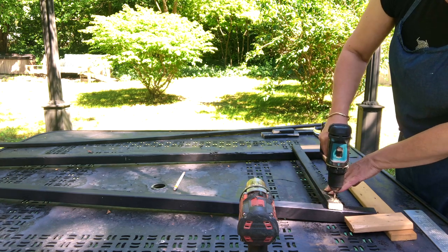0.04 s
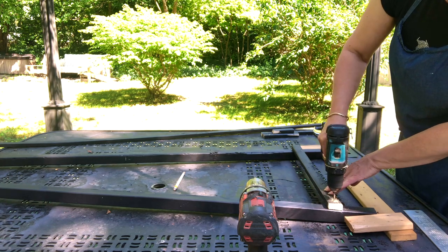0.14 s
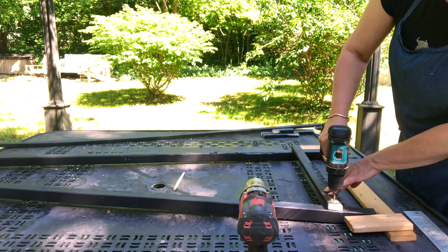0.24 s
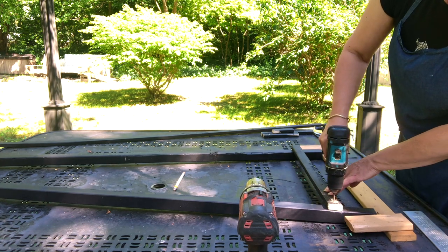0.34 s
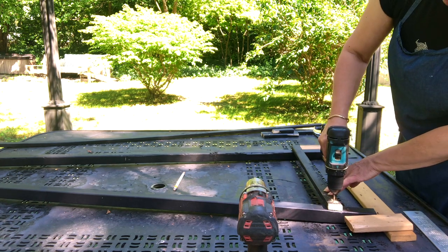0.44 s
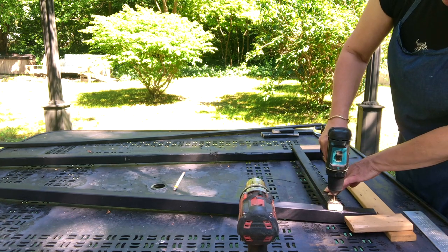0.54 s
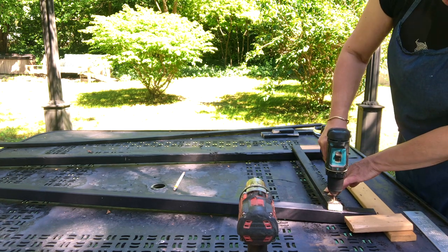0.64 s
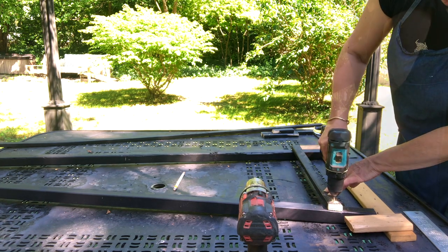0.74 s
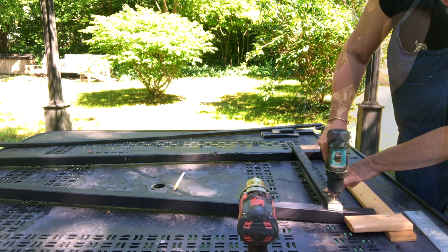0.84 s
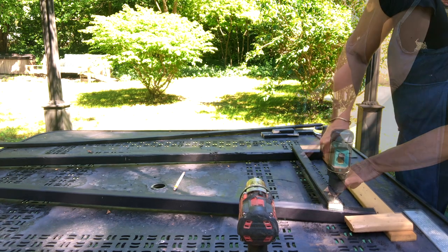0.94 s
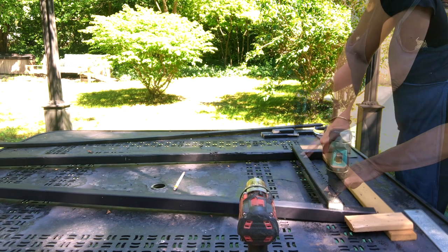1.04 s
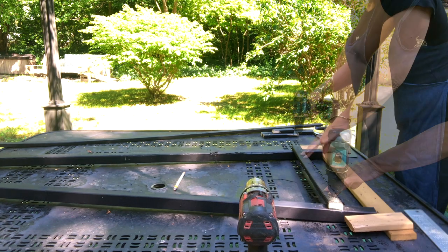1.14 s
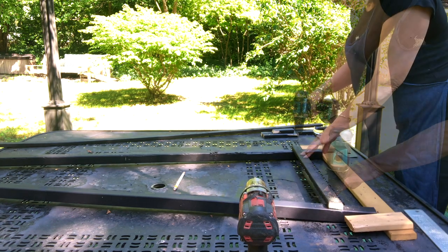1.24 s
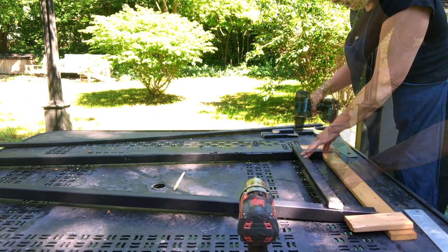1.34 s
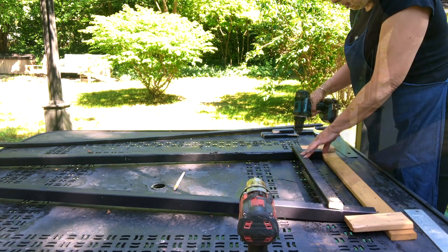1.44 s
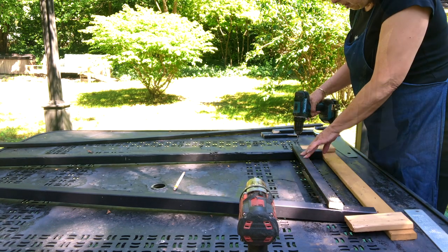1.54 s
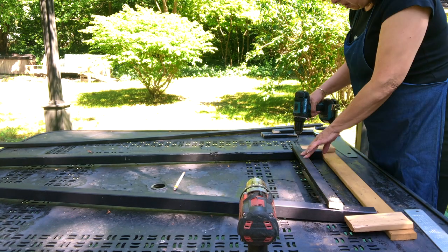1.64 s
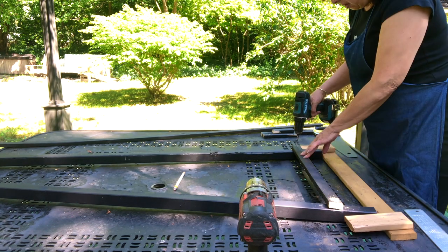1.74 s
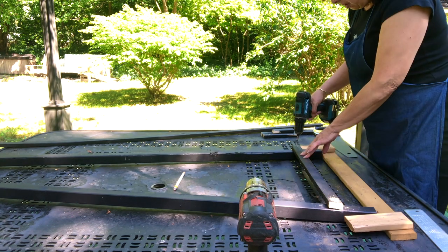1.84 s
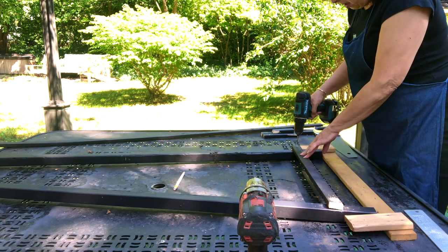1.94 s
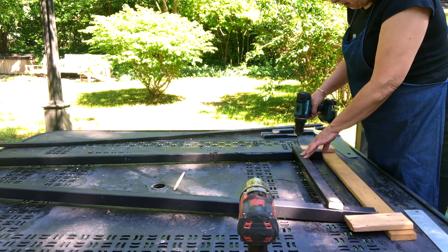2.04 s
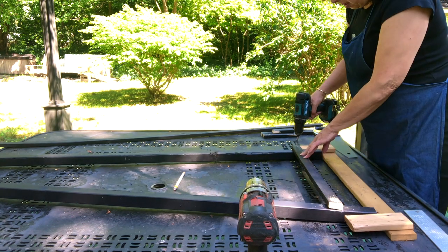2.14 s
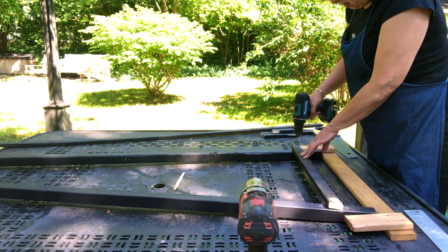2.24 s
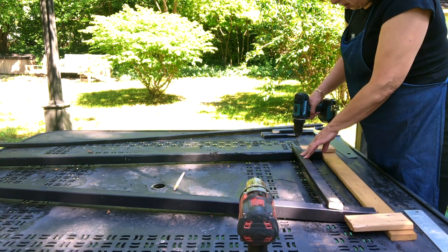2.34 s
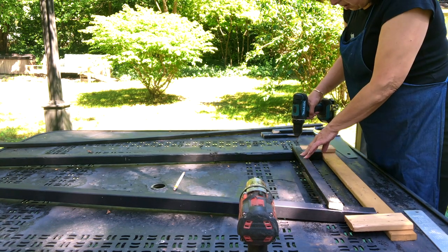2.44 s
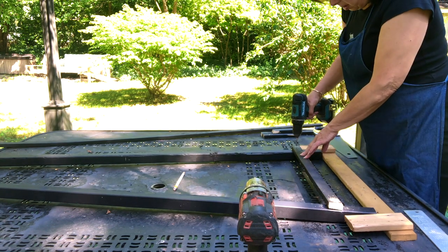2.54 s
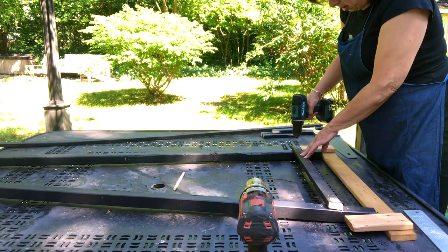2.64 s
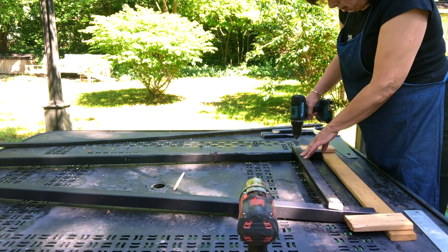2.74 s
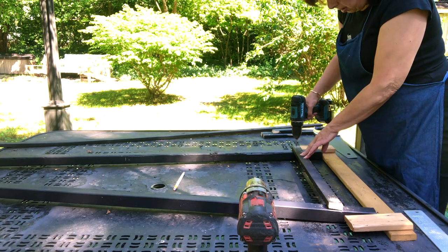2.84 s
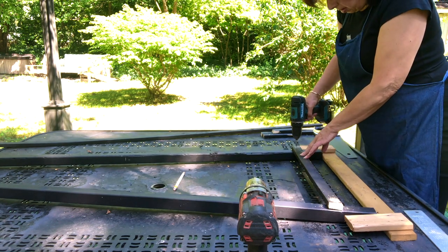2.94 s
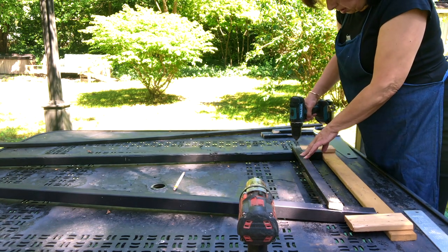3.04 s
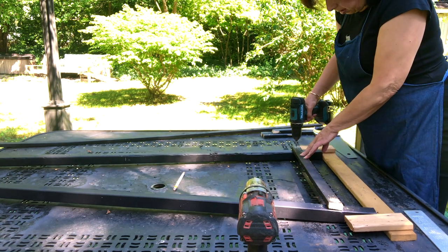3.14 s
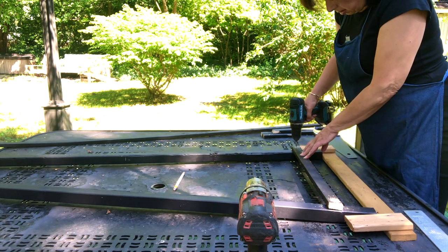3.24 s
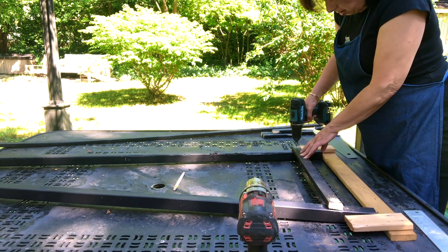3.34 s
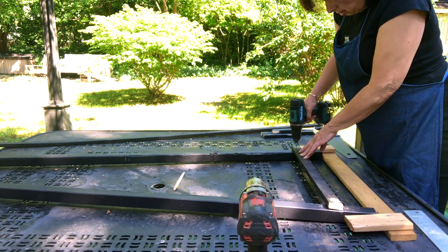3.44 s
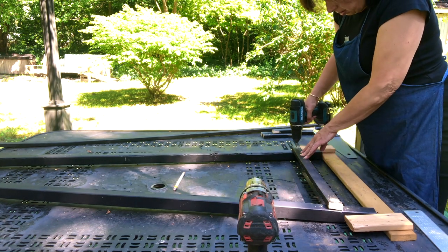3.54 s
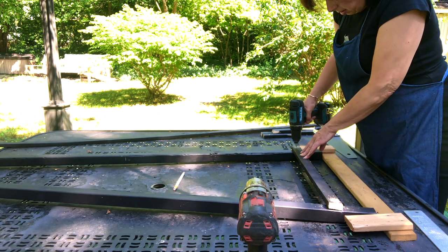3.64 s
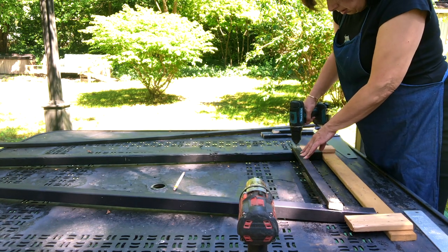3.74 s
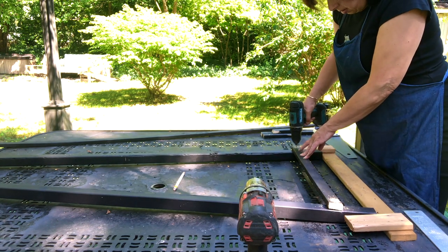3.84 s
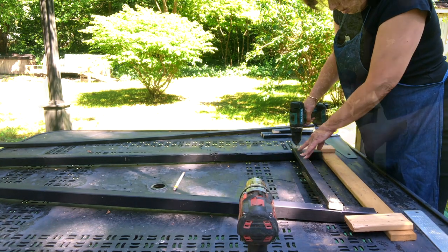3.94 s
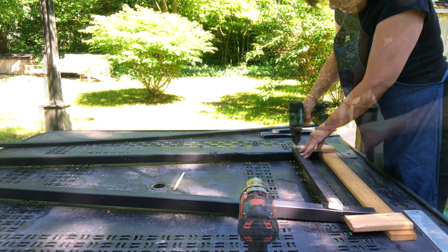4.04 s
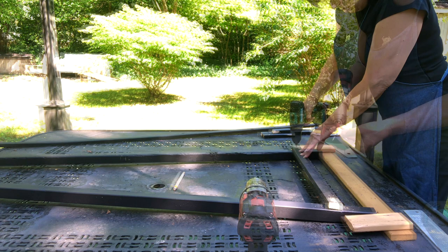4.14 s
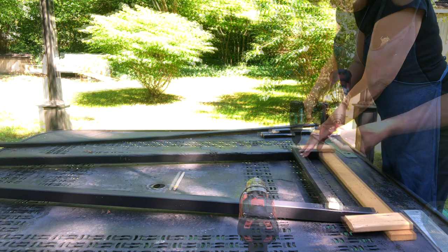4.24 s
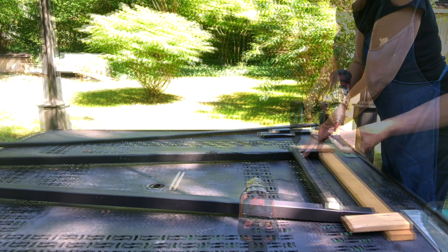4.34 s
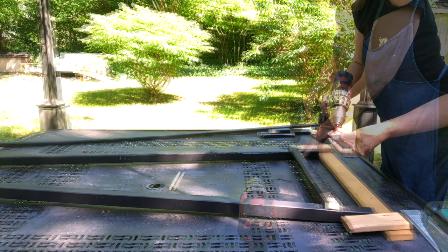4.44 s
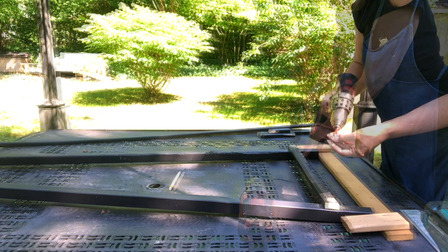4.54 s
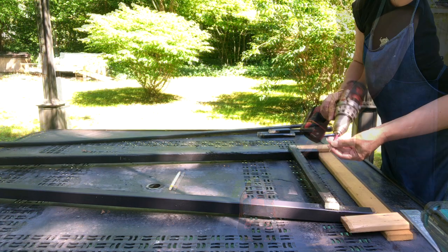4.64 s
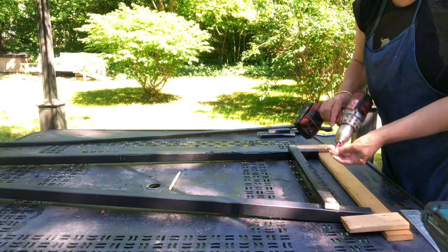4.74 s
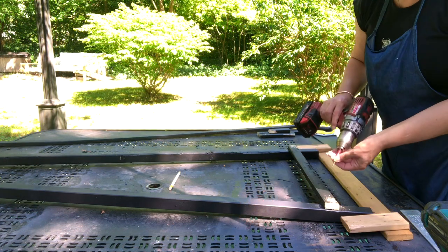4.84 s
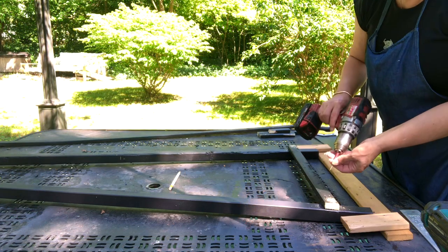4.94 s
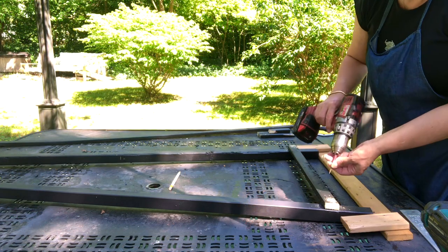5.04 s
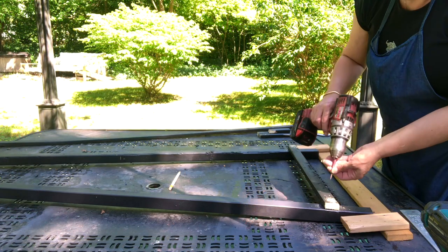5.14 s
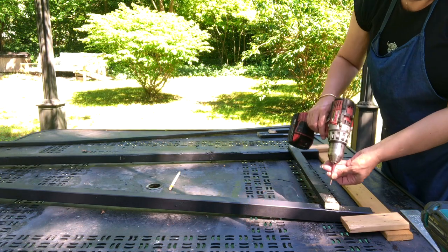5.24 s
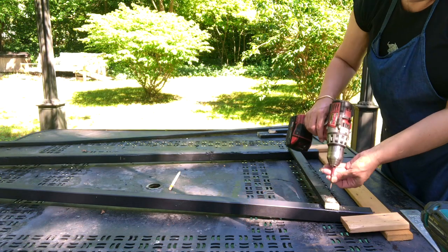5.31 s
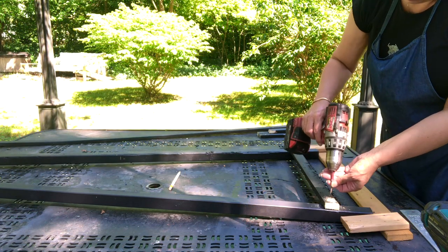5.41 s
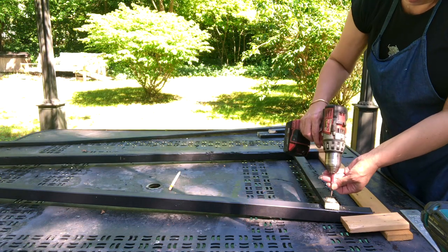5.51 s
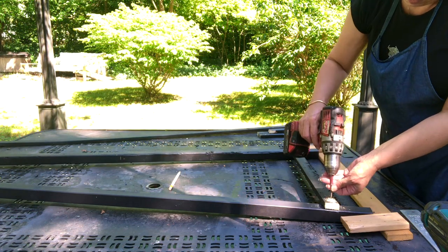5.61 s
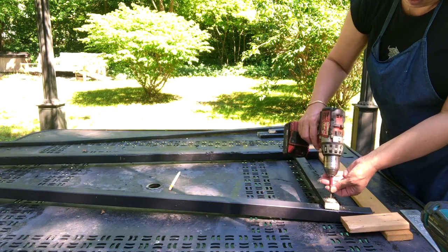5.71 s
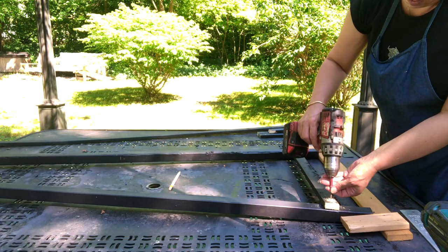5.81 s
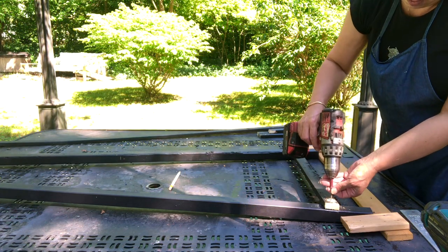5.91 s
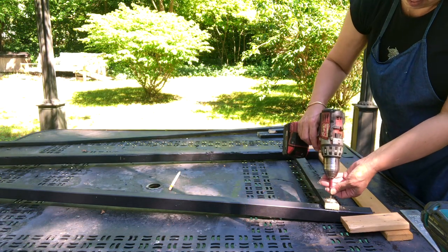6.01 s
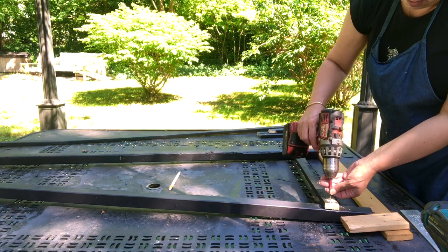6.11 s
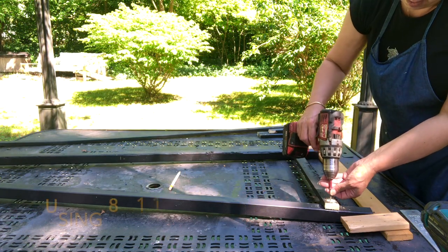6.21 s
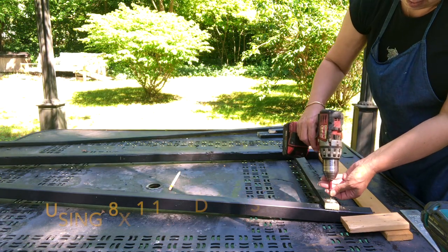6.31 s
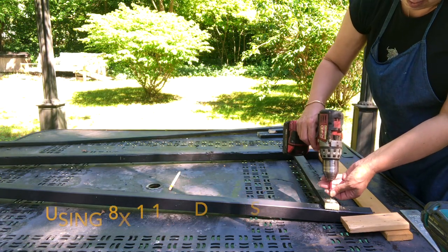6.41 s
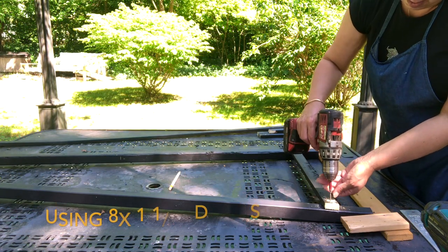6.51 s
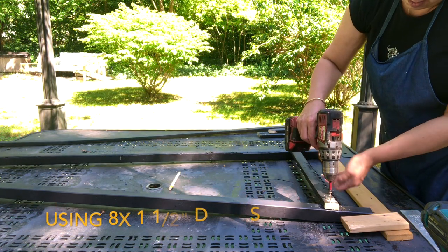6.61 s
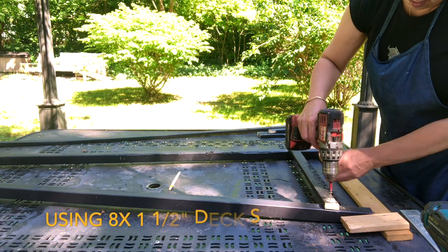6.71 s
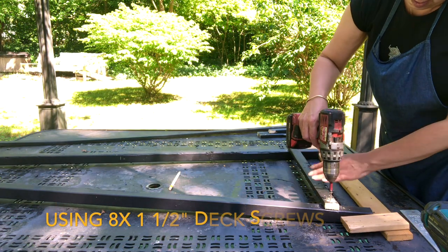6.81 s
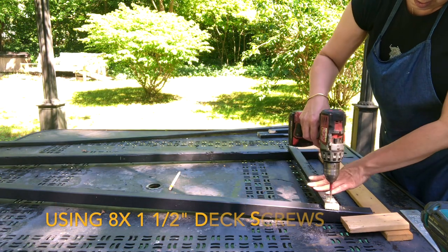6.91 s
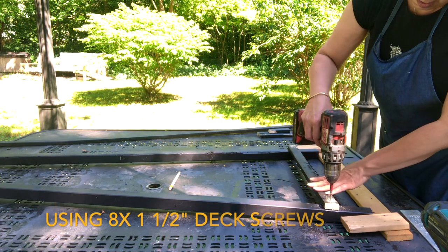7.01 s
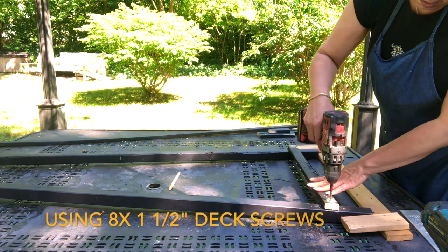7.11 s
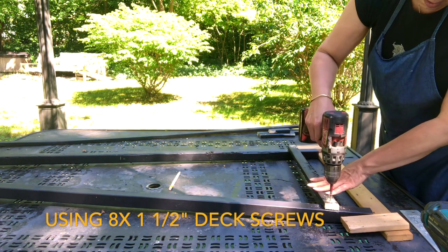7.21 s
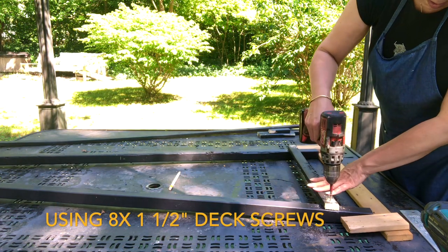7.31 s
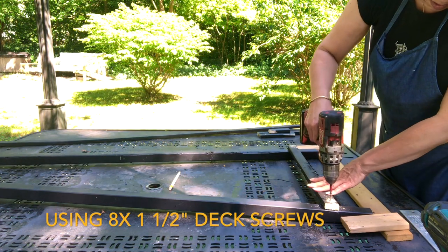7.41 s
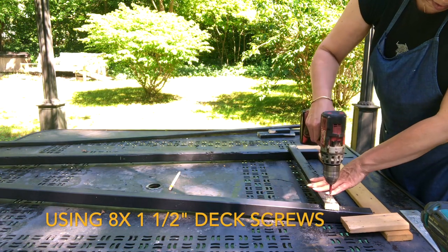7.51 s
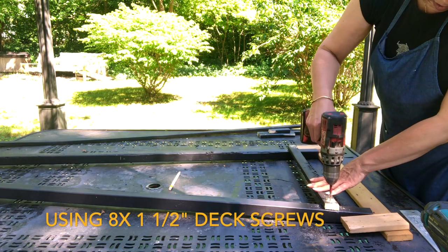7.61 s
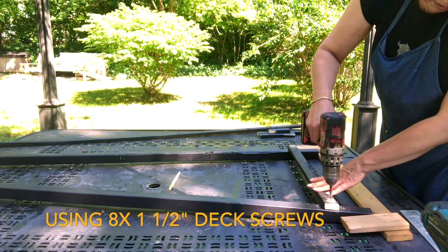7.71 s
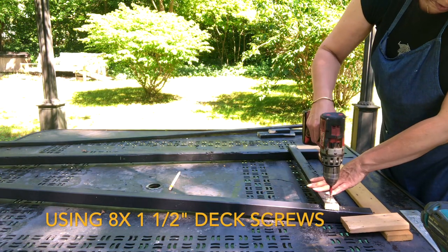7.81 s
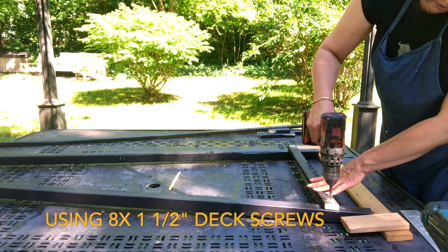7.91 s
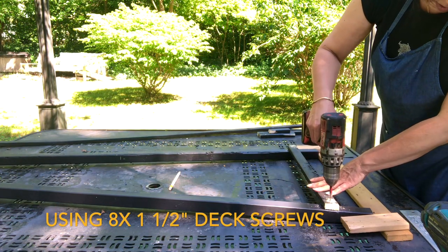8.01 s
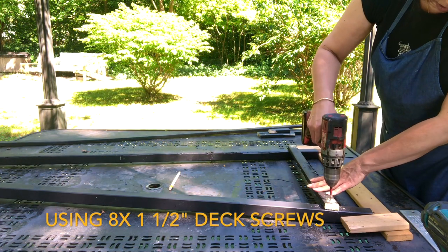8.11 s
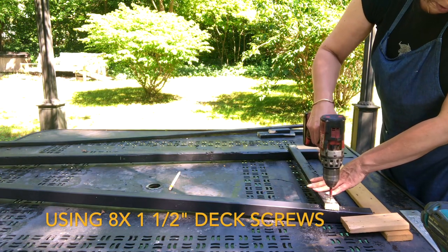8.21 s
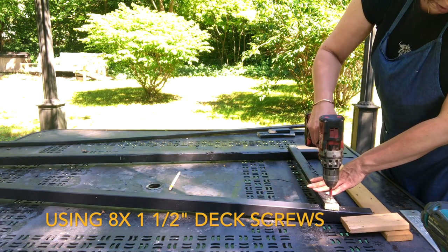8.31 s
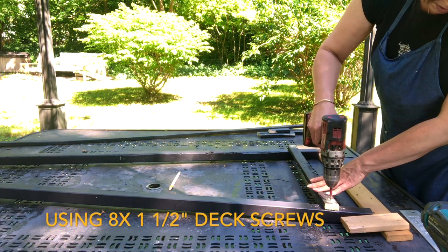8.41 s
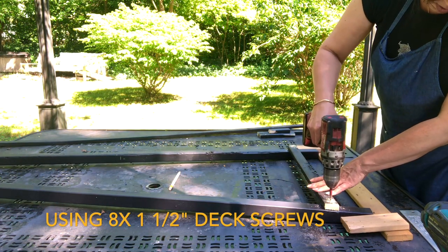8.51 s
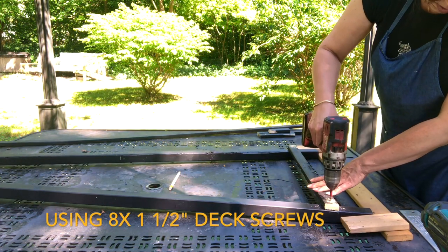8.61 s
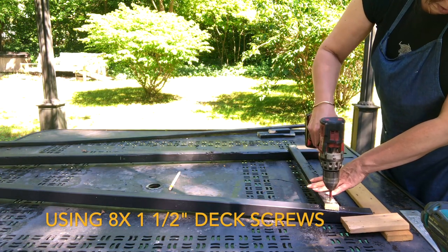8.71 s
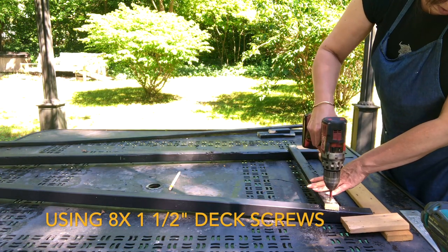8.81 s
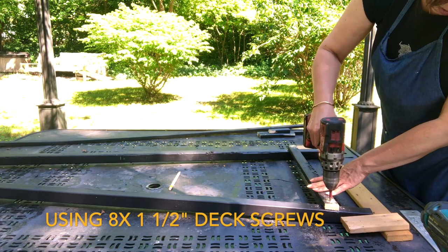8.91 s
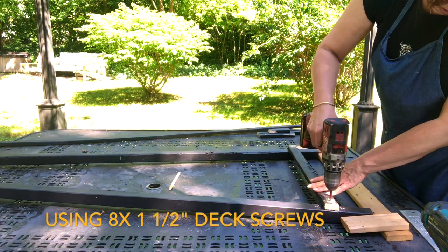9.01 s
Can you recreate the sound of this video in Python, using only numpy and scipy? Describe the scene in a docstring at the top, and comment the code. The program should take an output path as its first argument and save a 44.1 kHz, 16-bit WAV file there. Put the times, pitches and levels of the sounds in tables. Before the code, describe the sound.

Close mono pickup outdoors at a hollow plastic table. From 0 s a cordless drill is already running at full speed in wood: dense bright gear rattle, several high whines wavering slightly with load, low air rumble beneath. It fades from about 0.7 to 1.6 s. Sharp trigger clicks and a table jolt at 1.93-1.98 s start a second run, quieter, brighter and hissier, with singing whines; it bogs down slightly near 3.9 s, recovers, and fades by 4.9 s. A near insect buzzes behind it, the rumble swelling around 3.7 s. A distant engine rises in pitch, drops near 5.7 s and hums on. Two tiny rising bird chirps come at 5.6 and 5.8 s over hiss and a faint far insect. A rougher second drill pulls at 7.4-7.8, 7.9-8.3, 8.45-8.7 and 8.9-9.5 s, each led by a thin whistle, braking quickly, with small clicks and dull yard echoes.

```python
"""A cordless drill bores two pilot holes in wood on a hollow plastic table outdoors, each run fading away;
then a second drill drives a screw in four short trigger pulls. Clicks mark the triggers and gear play.
Both drills are coloured noise for the tooth contacts plus sines that follow the motor speed.
Behind them: air rumble and far hiss (shaped noise), a near and a far insect (pulse trains), two bird chirps
(gliding sines) and a distant engine (firing orders) that pulls away through a gear change."""
import sys
import numpy as np
from scipy import signal
from scipy.fft import rfft, irfft, next_fast_len
from scipy.io import wavfile

SR = 44100
rng = np.random.default_rng(int(sys.argv[2]) if len(sys.argv) > 2 else 0)


def unload_wav(signal):
    """Save mono or channel-first audio to the path in sys.argv[1] as 16-bit WAV at rate SR, clipped to [-1, 1]."""
    wavfile.write(
        sys.argv[1],
        SR,
        np.round(np.clip(np.atleast_2d(signal).T, -1, 1) * 32767).astype(np.int16),
    )


N = 399546
T = np.arange(N) / SR   # s


def amp(db):
    """dB to gain."""
    return 10 ** (np.asarray(db) / 20)


def to_db(gain):
    """Gain to dB."""
    return 20 * np.log10(gain)


def rms_one(x):
    """Scale to rms 1."""
    return x / np.sqrt(np.mean(x ** 2) + 1e-20)


def in_time(rows):
    """Columns as curves over time, and a gate that is open from the first row to just after the last."""
    s, *columns = np.transpose(rows)
    gate = np.clip(np.minimum(T - s[0] + .004, s[-1] + .02 - T) / .004, 0, 1)
    return gate, [np.interp(T, s, column) for column in columns]


def drift(rate):
    """Slow chance: random points of spread 1, rate a second, joined by half-cosines."""
    points = rng.standard_normal(int(N / SR * 400) + 9)
    at = T * min(rate, 399)
    whole = at.astype(int)
    blend = .5 - .5 * np.cos(np.pi * (at - whole))
    return points[whole] * (1 - blend) + points[whole + 1] * blend


def resonance_db(hz, peaks):
    """Summed lift of resonances, each given by its centre in Hz, width in Hz and lift in dB."""
    return sum(lift / (1 + (2 * (hz - at) / width) ** 2) for at, width, lift in peaks)


def colour(x, spectrum, peaks=(), edges_hz=(1, 40000)):
    """Shape by a spectrum and resonance lifts, split at the edges; each band rms 1."""
    size = next_fast_len(N)
    hz = np.maximum(np.fft.rfftfreq(size, 1 / SR), 1)
    table = np.array(spectrum)
    db = np.interp(np.log(hz), np.log(table[:, 0]), table[:, 1]) + resonance_db(hz, peaks)
    shaped = rfft(x, size) * amp(db)
    below = [1 / (1 + (hz / edge) ** 10) for edge in edges_hz]
    return [rms_one(irfft(shaped * np.sqrt(np.abs(high - low)), size)[:N])
            for low, high in zip(below, below[1:])]


def ring(clicks, hz, t60):
    """A resonator: a unit click sets off a dying sine that starts at about height 1."""
    r, w = amp(-60 / (t60 * SR)), 2 * np.pi * hz / SR
    return signal.lfilter([0, np.sin(w)], [1, -2 * r * np.cos(w), r * r], clicks + 1e-18)


def tone(hz, flicker_db, rate):
    """A sine of rms about 1 on a pitch curve, its level flickering."""
    phase = np.cumsum(hz + 0 * T) / SR + rng.random()
    return np.sqrt(2) * amp(flicker_db * drift(rate)) * np.sin(2 * np.pi * phase)


# three passages melt into one another: end of each cross-fade in s, its length in s, shape
FADE_ENDS_S, FADE_S, FADE_CURVE = (1.638, 4.887), 0.99, 2.05


def passages():
    """Gain of each passage: it rises as the one before it sinks."""
    turn = [np.pi / 2 * np.clip((T - end) / FADE_S + 1, 0, 1) for end in FADE_ENDS_S]
    out = [np.cos(x) ** FADE_CURVE for x in turn]
    into = [np.sin(x) ** FADE_CURVE for x in turn]
    return out[0], into[0] * out[1], into[1]


def gears(rotor_hz, levels, spectrum, case, edges_hz, throb, rough_db):
    """Dense tooth contacts, throbbing once a rotor turn, heard through table, housing, gearbox and vents."""
    rattle_db, housing_db, treble_db, *boom_db = levels
    turn = np.sin(2 * np.pi * np.cumsum(rotor_hz * (1 + .02 * drift(30))) / SR)
    roughness = amp(rough_db * drift(300) + .5 * drift(25))
    contacts = rng.standard_normal(N) * (1 + throb * turn) * roughness
    *boom, housing, rattle, treble = colour(contacts, spectrum, case, edges_hz)
    # the bands run upwards, the levels list the boom before the deeper thud
    table = sum(amp(db) * band for db, band in zip(boom_db[::-1], boom))
    return table + amp(rattle_db) * (rattle + amp(housing_db) * housing + amp(treble_db) * treble)


# Colour of the pilot drill, near the microphone and turned away. Each row: frequency in Hz, density in dB per Hz.
NEAR_COLOUR, AWAY_COLOUR = [(120, -45.5), (200, -9), (340, -21.5), (408, -13.5), (447, -16), (1110, -17.5),
                            (1920, -12.5), (2670, -20), (3330, -11), (3510, -7.5), (3780, -7.5), (4790, -1),
                            (5450, -5.5), (7290, -6.5), (15700, -9)], [(120, -36), (200, -6), (352, -12.5), (415, -7), (620, -10),
                                          (862, -8), (927, -8.5), (1460, -6), (1920, -2.5), (2620, -3.5),
                                          (3090, -2), (5550, 6), (7030, 6), (7850, 4.5), (15700, -5.5)]
# Resonances of its case, heard the same two ways. Each row: centre in Hz, width in Hz, lift in dB.
NEAR_CASE, AWAY_CASE = [(412, 26, 7), (657, 48, 8), (1277, 81, 8), (1880, 760, 4.5), (4740, 670, 2),
                        (5480, 280, -4), (6500, 230, 3), (7360, 320, 2.5), (8160, 380, 4), (9250, 320, -1),
                        (9950, 580, 0.5), (11000, 520, -6.5), (11800, 240, 1), (12900, 240, 0.5),
                        (14150, 620, 1)], [(618, 33, 8.5), (790, 44, 4.5), (1990, 440, 5), (5170, 170, 2),
                                           (12200, 400, -3), (4205, 680, 7.5), (4980, 300, 3.5),
                                           (5960, 420, 4), (6900, 630, 3), (11200, 230, 3.5),
                                           (12840, 600, 1)]
# The two holes. Each row: motor start in seconds, gear rattle in dB at full speed, then housing, treble
# and table boom in dB re rattle, also at full speed.
HOLES = [(-1, -22, -6.5, -7.5, -15), (1.962, -26.5, -7.5, -11, -12)]
# Load on the bit, one list a hole. Each row: time in seconds, speed as the pitch step in Hz that the
# whines share, before spin-up and small wander.
LOAD = [
    [(0, 397.6), (.23, 398), (.3, 396.3), (.35, 393), (.47, 395.2), (.56, 390.2), (.72, 387.8),
     (.84, 393.3), (.964, 389.5), (1.166, 399.4), (1.31, 399), (1.45, 402)],
    [(2.25, 398.8), (2.52, 400.2), (2.73, 392.2), (2.86, 394.1), (2.94, 390.8), (3.08, 391.8),
     (3.39, 383.5), (3.52, 388.2), (3.89, 374.5), (3.94, 375.3), (4.13, 389.8), (4.28, 393.7), (4.33, 391),
     (4.69, 399.4), (4.76, 397), (4.86, 362)],
]
# Pitches of the whines in steps: rotor hum, commutator, mesh, a second commutator multiple, fan, a third.
WHINE_STEPS = (2.4, 8, 9, 16, 18.4, 24)
# Mean level of the commutator, mesh and fan whines, one list a hole. Each row: time in seconds, then
# commutator, mesh and fan in dB re rattle.
SINGING = [
    [(0, -15, -5, -14.5), (.3, -17, -8, -20), (.6, -17, -1, -13.5), (1, -17.5, -1, -10.5),
     (1.2, -22, -4, -14), (1.5, -18, -16, -9)],
    [(2.1, -13, -25, -7), (2.2, -20, -21, -12), (2.35, -13.5, -12.5, -22), (2.55, -12, -7.5, -12),
     (2.75, -15, -10.5, -6), (3.2, -13.5, -10.5, -2.5), (3.6, -12.5, -8, -6.5), (3.9, -15.5, -13.5, -14.5),
     (4.2, -10, -7.5, -4.5), (4.7, -9.5, -9.5, -4), (4.82, -13, -23, -12)],
]
# Mean level of the whines at 2.4, 16 and 24 steps. Each row, one a hole: the three in dB re rattle.
OTHER_WHINES = [(-30, -14, -27), (-21.5, -13.5, -18)]
# Resonances where a whine flares as it crosses. Each row: centre in Hz, width in Hz, lift in dB.
FLARES = [(2920, 260, 8.5), (6755, 400, 4), (8350, 500, 14.5)]
# Faint upper commutator orders, in steps.
UPPER_ORDERS = (32, 40)
ROTOR_PER_STEP, SPIN_UP_S = .8, .055
RATTLE_POWER, HOUSING_POWER, TREBLE_POWER, BOOM_POWER = 0.84, 3.2, 2.6, 0.88   # gains go as speed to these
WHINE_WANDER_DB, ROTOR_HUM_BREAKS_DB = 3, 4
SIDE_LINE_DB, UPPER_ORDERS_DB = -14.5, -18   # re mesh whine, re treble
JOLT_S, JOLT_T60_S, JOLT_DB = 1.927, .55, -33   # the trigger hand shakes the table


def pilot_drill(hole, load, singing, others, spectrum, case):
    """Gear rattle plus rotor, commutator, mesh and fan whines, all locked to the motor speed."""
    start, rattle_db, housing_db, treble_db, boom_db = hole
    spin = np.clip(1 - np.exp(np.minimum(start - T, 0) / SPIN_UP_S), .001, 1)
    spin_db = to_db(spin)

    boom_db = rattle_db + boom_db
    if start > 0:   # a motor that starts within earshot
        jolt = amp(JOLT_DB - 60 * np.abs(T - JOLT_S) / JOLT_T60_S) * (T > JOLT_S)
        boom_db = to_db(amp(boom_db + BOOM_POWER * spin_db) * (T > start) + jolt + 1e-9)
    rattle_db = rattle_db + RATTLE_POWER * spin_db
    housing_db = housing_db + HOUSING_POWER * spin_db
    treble_db = treble_db + TREBLE_POWER * spin_db

    _, (step_hz,) = in_time(load)
    step_hz = step_hz * spin * (1 + 0.00068 * drift(40) + .002 * drift(12))
    out = gears(ROTOR_PER_STEP * step_hz, (rattle_db, housing_db, treble_db, boom_db), spectrum, case,
                (200, 1200, 2600, 9000, 40000), throb=0.12, rough_db=0.5)

    _, (commutator_db, mesh_db, fan_db) = in_time(singing)
    rotor_db = others[0] + ROTOR_HUM_BREAKS_DB * drift(14)
    whine_db = rotor_db, commutator_db, mesh_db, others[1], fan_db, others[2]
    for steps, db in zip(WHINE_STEPS, whine_db):
        flare_db = resonance_db(steps * step_hz, FLARES)
        level_db = rattle_db + db + flare_db + 1.5 * spin_db + WHINE_WANDER_DB * drift(5)
        out += amp(level_db) * tone(steps * step_hz, 1.2, 60)
    # side line of the mesh: a gear runs out of round
    out += amp(rattle_db + mesh_db + SIDE_LINE_DB) * tone(10 * step_hz, 2.4, 30)
    for steps in UPPER_ORDERS:
        out += amp(rattle_db + treble_db + UPPER_ORDERS_DB) * tone(steps * step_hz, 4, 12)
    return out


# Open air around the table. Each row, one a passage: rumble, drone, far hiss and insect, all mean level in dB.
AIR = [(-43, -43, -57, -100), (-58, -52, -53.5, -56.5), (-58.5, -54.5, -56, -74)]
# Colour of rumble with drone, and of the far hiss. Each row: frequency in Hz, density in dB per Hz.
RUMBLE_COLOUR, HISS_COLOUR = [(12, -48.5), (20, -21.5), (45, 1.5), (70, 9), (285, -8.5), (315, -2.5),
                              (344, -21.5), (400, -8.5), (520, -26.5), (880, -120)], [(250, -2.5), (400, -3), (830, -3), (1150, -4.5), (1600, -8.5),
                                              (2500, -16), (4000, -19.5), (7700, -27), (10000, -31),
                                              (15700, -37)]
# A swell of the rumble: its peak in seconds, width in seconds, lift in dB.
SWELL = (3.75, 0.57, 11)


def open_air(fades):
    """Lumpy low rumble, a drone above it and smooth far hiss, all shaped noise."""
    rumble_gain, drone_gain, hiss_gain = (
        sum(amp(row[k]) * fade for row, fade in zip(AIR, fades)) for k in range(3))
    peak_s, width_s, lift_db = SWELL
    swell_db = lift_db * np.exp(-((T - peak_s) / width_s) ** 2)
    rumble, drone = colour(rng.standard_normal(N), RUMBLE_COLOUR, edges_hz=(30, 115, 330))
    hiss = colour(rng.standard_normal(N), HISS_COLOUR, edges_hz=(330, 40000))[0]
    out = rumble_gain * amp(swell_db + 0.61 * drift(5.5)) * rumble
    out += drone_gain * amp(0.79 * drift(1.6)) * drone
    return out + hiss_gain * amp(0.52 * drift(3.2)) * hiss


def insect(pulses_per_s, song, edges_hz):
    """Steady wing pulses give a comb of thin lines; strips of it swell and sink on their own."""
    wing_turns = np.cumsum(pulses_per_s * (1 + 0.0021 * drift(4.2))) / SR
    pulses = np.diff(np.floor(wing_turns), prepend=0)
    buzz = pulses * amp(3.5 * drift(150)) + 0.076 * rng.standard_normal(N)
    buzz = colour(buzz, song, edges_hz=edges_hz)[0]
    size = next_fast_len(N)
    spectrum, hz = rfft(buzz, size), np.fft.rfftfreq(size, 1 / SR)
    out = 0
    for strip in range(7):   # every seventh line shares one swell
        mine = np.round(hz / pulses_per_s) % 7 == strip
        out = out + amp(3.9 * drift(6.5)) * irfft(spectrum * mine, size)[:N]
    return out


# Songs of a near insect and a far one. Each row: frequency in Hz, density in dB per Hz.
NEAR_SONG, FAR_SONG = [(4500, -6), (5900, -1.5), (6300, -7.5), (7000, 5.5), (7600, -9), (8000, 1.5),
                       (8600, -8), (8800, -25), (9600, -21), (10500, -30.5)], [(4500, -18), (5800, 0), (6500, -6), (7300, -1), (8050, 1),
                                          (8150, -14), (9200, -19)]
NEAR_PULSES_PER_S, FAR_PULSES_PER_S = 156.9, 186.3


def insects(fades):
    """The near buzz sounds in the second passage, the far one in the third."""
    near, far = (amp(row[3]) * fade for row, fade in zip(AIR[1:], fades[1:]))
    out = near * insect(NEAR_PULSES_PER_S, NEAR_SONG, (4500, 10500))
    return out + far * insect(FAR_PULSES_PER_S, FAR_SONG, (4500, 9200))


# Trigger and gear play taking up. Each row: time in seconds, reference level in dB, then knock and
# low thump in dB re that level.
CLICKS = [(1.927, -17, -14, -27), (1.9627, -16.5, -23, -15), (1.971, -22, -13, -20),
          (1.9792, -24, -18, -17), (5.5964, -49, -8, -20), (7.427, -26, -15, -28), (7.8793, -48, -9, -17),
          (7.894, -50, 10, -18), (8.3244, -31, -11, -14), (8.4325, -33.5, 0, -20), (8.4512, -35, -17, -22),
          (8.8796, -31.5, -2.5, -26), (8.8971, -39, -6, -24), (8.926, -35, 0, -6)]
KNOCK_HZ, KNOCK_T60_S, THUMP_HZ, THUMP_T60_S, CRACK_T60_S = 1520, 0.016, 544, 0.11, 0.0051


def clicks():
    """Each click is a short noise crack, a ringing knock of the case and a ringing thump of the table."""
    s, level_db, knock_db, thump_db = np.transpose(CLICKS)
    trains = np.zeros((3, N))
    trains[:, (s * SR).astype(int)] = amp([level_db - 6, level_db + knock_db, level_db + thump_db])
    decay = amp(-60 / (CRACK_T60_S * SR))
    crack = signal.lfilter([1], [1, -decay], trains[0] + 1e-18) * rng.choice([-1, 1], N)
    crack = signal.sosfilt(signal.butter(2, [1300, 10500], "band", fs=SR, output="sos"), crack)
    return crack + ring(trains[1], KNOCK_HZ, KNOCK_T60_S) + ring(trains[2], THUMP_HZ, THUMP_T60_S)


# Distant engine. Each row: time in seconds, cycles per second, then the 2nd, 3rd and 5th multiple,
# each as mean level in dB.
ENGINE = [(3.3, 28.5, -60, -59, -49), (3.68, 31, -47, -34.5, -58), (3.95, 33.94, -51, -52, -62),
          (4.17, 33.27, -50, -38.5, -53), (4.42, 38.5, -44, -51, -51), (4.55, 37.04, -49, -47, -51.5),
          (4.78, 39.33, -57, -53.5, -53), (5.21, 43.4, -63, -52.5, -63), (5.52, 43.95, -54, -53, -69),
          (5.69, 37.13, -50, -57, -57.5), (5.87, 35.2, -56, -49.5, -61), (6.11, 31.6, -57, -46, -66),
          (6.54, 33, -57, -41.5, -58), (6.72, 33.5, -63, -57, -61), (6.86, 32.44, -58, -42, -57.5),
          (7.3, 34.02, -52, -51.5, -51.5), (8.19, 35.7, -52, -39.5, -63), (8.79, 35.98, -49, -46, -48),
          (9.06, 35.4, -49, -46, -47)]


def engine():
    """Low firing orders as sines; the 4th and 6th follow the 5th."""
    gate, (cycle_hz, second_db, third_db, fifth_db) = in_time(ENGINE)
    orders = zip((2, 3, 4, 5, 6), (second_db, third_db, fifth_db - 7, fifth_db, fifth_db - 7))
    return gate * sum(amp(db) * tone(order * cycle_hz, 1.2, 8) for order, db in orders)


# Bird in the trees. Each row: start in seconds, length in seconds, first pitch in Hz, last pitch in Hz,
# peak level in dB before the echo.
CHIRPS = [(5.555, 0.0446, 7150, 7840, -52), (5.793, 0.051, 6400, 7540, -54)]
TREE_ECHO_DB, TREE_ECHO_T60_S = -18, .5


def bird():
    """Rising whistles that level off, scattered back by the trees."""
    out = np.zeros(N)
    for start, length, from_hz, to_hz, db in CHIRPS:
        part = np.clip((T - start) / length, 0, 1)
        pitch = from_hz + (to_hz - from_hz) * np.sin(np.pi / 2 * part)
        out += amp(db) * np.sin(np.pi * part ** 1.1) * np.sin(2 * np.pi * np.cumsum(pitch) / SR)
    lag = T[:SR // 2]
    hits = (rng.random(len(lag)) < .03) * rng.standard_normal(len(lag))   # sparse
    echoes = hits * amp(TREE_ECHO_DB - 60 * lag / TREE_ECHO_T60_S) * (lag > .03)
    return out + signal.fftconvolve(out, echoes)[:N]


# Colour of the screw driver. Each row: frequency in Hz, density in dB per Hz.
DRIVER_COLOUR = [(71, -38.5), (120, -13.5), (271, -17), (471, -12), (589, -4.5), (1060, -12), (1630, -8),
                 (2660, -16), (4260, 0.5), (5110, -5.5), (7530, -7.5), (10900, -13), (15700, -11)]
# Resonances of its case. Each row: centre in Hz, width in Hz, lift in dB.
DRIVER_CASE = [(196, 30, 9), (249, 32, 10.5), (513, 68, 6), (1550, 350, 7), (2370, 290, 9.5),
               (2710, 170, 4.5), (2910, 470, 3.5), (4320, 640, 3.5), (4960, 320, -4), (5830, 460, 6),
               (6900, 320, 4.5), (7600, 320, 5.5), (8150, 320, -1), (9420, 290, -0.5), (11100, 620, -3),
               (12850, 950, 0.5)]
# Trigger pulls. Each row: whistle start in seconds, whistle length in seconds, whistle in dB, half speed
# after seconds, release in seconds, top mesh in Hz before the climb factor, sag in Hz per second before
# that factor, effort in dB added to the rattle, housing in dB added.
PULLS = [(7.4, 0.093, -56, 0.062, 7.765, 1462, -100, -0.5, 2.5),
         (7.942, .075, -57, .06, 8.255, 1809, 599, 2.5, -1),
         (8.452, .053, -59, .047, 8.69, 2107, 600, 0, 0), (8.893, 0.048, -60, .048, 9.49, 1940, 3, 0, 2.5)]
# Noise bands: rattle, housing re rattle, treble re rattle, table boom, table thud. Each row: level in dB at
# FULL_MESH_HZ before the pull's own offsets, power of the speed that its gain follows.
DRIVER_BANDS = [(-19.5, 3.5), (-9.5, -1.5), (-4.5, 0.9), (-37.5, 2), (-45, 0.9)]
# Gear mesh tones. Each row: multiple of the mesh pitch, level in dB re the mesh tone.
MESH_ORDERS = [(1, 0), (2, 0), (3, 1)]
FULL_MESH_HZ, PINION_TEETH, WHISTLE_HZ = 2000, 12, 7775
SPIN_UP_SPREAD, BRAKE_S, BRAKE_SHAPE, COAST_SHARE, COAST_S = .45, .1, .9, 0.13, .4
# the brake shakes the table: time to its peak, then boom and thud in dB before effort
BITE_S, BITE_DB = .065, (-46, -42)
# the mesh pitch climbs on after the noise is full, towards PITCH_LIFT
CLIMB_SHARE, CLIMB_S, PITCH_LIFT = .5, .055, 1.1
# at the crest mesh tone and treble stand out
CREST_S, CREST_WIDTH_S, CREST_TREBLE_DB, CREST_MESH_DB = 0.14, 0.048, 1, 11
MESH_DB, THUD_WANDER_DB = -22, 2.5   # mesh tone re rattle, away from the crest


def driver():
    """A rougher gearbox under load with a husky mesh tone, and the whistle that leads each pull."""
    mesh_hz = 1 + 0 * T
    effort_db, own_housing_db, climb, crest, whistle, bite = 0, 0, 1, 0, 0, 0
    for start, length, whistle_db, spin_up, release, top_hz, sag, effort, own_db in PULLS:
        run = np.maximum(np.minimum(T, release) - start, 0)   # s since the pull, held at release
        after = np.maximum(T - release, 0)   # s since release
        started = run > 0
        behind = 1 / (1 + np.exp((run / spin_up - 1) / SPIN_UP_SPREAD))   # share of speed still missing
        braking = (1 - COAST_SHARE) * np.maximum(1 - (after / BRAKE_S) ** BRAKE_SHAPE, 0)
        slowing = braking + COAST_SHARE * np.exp(-after / COAST_S)
        hz = (top_hz - sag * run) * (1 - behind) * slowing * started
        mesh_hz = np.maximum(hz, mesh_hz)
        effort_db = np.where(started, effort, effort_db)
        own_housing_db = np.where(started, own_db, own_housing_db)
        to_climb = CLIMB_SHARE * np.exp(-np.maximum(run - spin_up, 0) / CLIMB_S)
        climb = np.where(started, PITCH_LIFT - to_climb, climb)
        crest = crest + np.exp(-((T - start - CREST_S) / CREST_WIDTH_S) ** 2)
        bite = bite + amp(effort) * (after / BITE_S * np.exp(1 - after / BITE_S)) ** 2
        whistle_times = start + np.array([0, .004, length, length + .05])
        whistle = whistle + amp(whistle_db) * np.interp(T, whistle_times, [0, 1, 1, 0])

    speed_db = to_db(mesh_hz / FULL_MESH_HZ)
    rattle_db, housing_db, treble_db, *table_db = [db + power * speed_db for db, power in DRIVER_BANDS]
    boom_db, thud_db = [to_db(amp(level) + amp(db) * bite) for level, db in zip(table_db, BITE_DB)]
    rattle_db = rattle_db + effort_db
    housing_db = housing_db + own_housing_db
    treble_db = treble_db + CREST_TREBLE_DB * crest
    thud_db = thud_db + THUD_WANDER_DB * drift(27)

    mesh_hz = mesh_hz * climb
    out = gears(mesh_hz / PINION_TEETH, (rattle_db, housing_db, treble_db, boom_db, thud_db), DRIVER_COLOUR,
                DRIVER_CASE, (130, 330, 1200, 2600, 9000, 40000), throb=0.066, rough_db=1.0)
    for order, db in MESH_ORDERS:
        husky_hz = order * mesh_hz * (1 + 0.0031 * drift(60))
        out += amp(rattle_db + MESH_DB + CREST_MESH_DB * crest + db) * tone(husky_hz, 4.35, 50)
    octave = amp(-1) * tone(2 * WHISTLE_HZ, 1.1, 30)
    return out + whistle * (tone(WHISTLE_HZ, 1.2, 30) + octave)


YARD_ECHO_DB, YARD_T60_S, YARD_CUT_HZ = -27, .5, 2300


def yard(x):
    """Dull scattered echoes off table, posts and hedge."""
    lag = T[:SR // 2]
    scatter = rng.standard_normal(len(lag)) * amp(-60 * lag / YARD_T60_S)
    scatter = signal.lfilter(*signal.butter(1, YARD_CUT_HZ, fs=SR), scatter)
    return x + amp(YARD_ECHO_DB) * signal.fftconvolve(x, scatter / np.linalg.norm(scatter))[:N]


def scene():
    """Everything reaches one microphone, so both channels are alike."""
    fades = passages()
    first = pilot_drill(HOLES[0], LOAD[0], SINGING[0], OTHER_WHINES[0], NEAR_COLOUR, NEAR_CASE)
    second = pilot_drill(HOLES[1], LOAD[1], SINGING[1], OTHER_WHINES[1], AWAY_COLOUR, AWAY_CASE)
    drills = fades[0] * first + fades[1] * second + yard(driver())
    background = open_air(fades) + insects(fades) + engine() + bird()
    return np.tile(drills + clicks() + background, (2, 1))


CUTOFF_HZ = 15760


def record(dry):
    """The top is cut steeply by an elliptic low-pass."""
    return signal.sosfilt(signal.ellip(14, .3, 75, CUTOFF_HZ, fs=SR, output="sos"), dry)


dry = scene()
out = record(dry)
unload_wav(out)
```